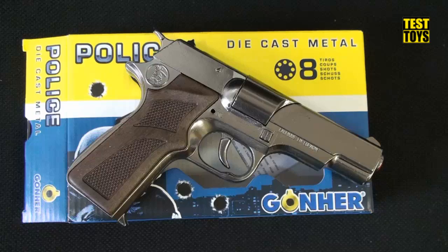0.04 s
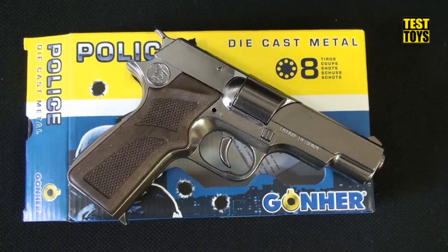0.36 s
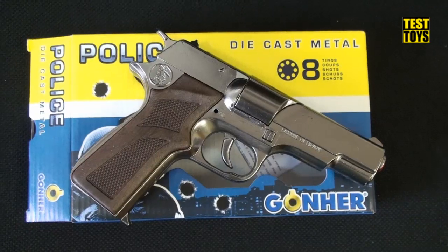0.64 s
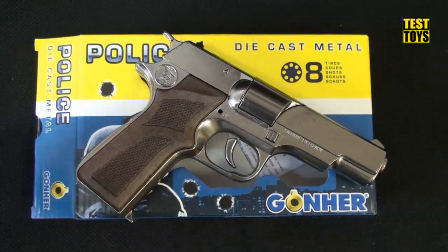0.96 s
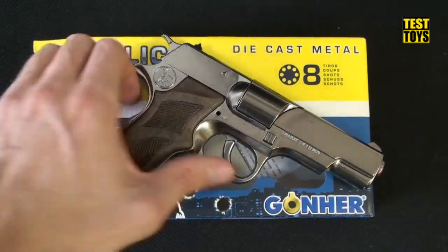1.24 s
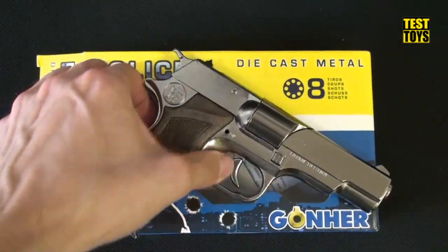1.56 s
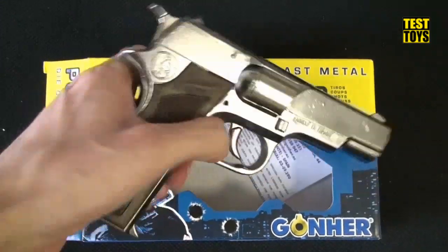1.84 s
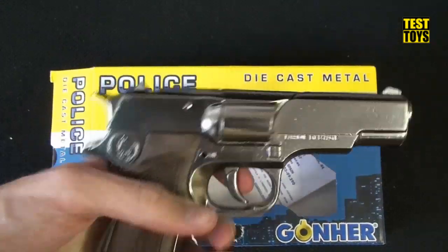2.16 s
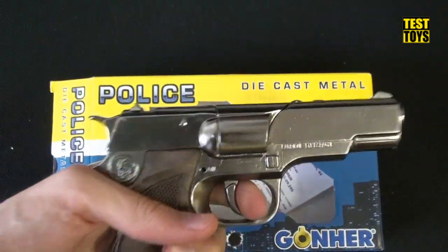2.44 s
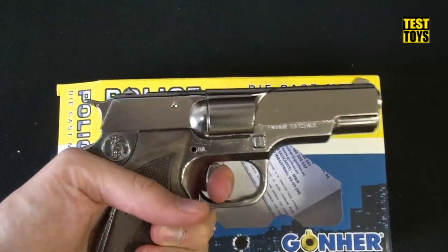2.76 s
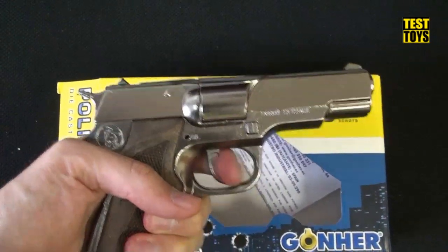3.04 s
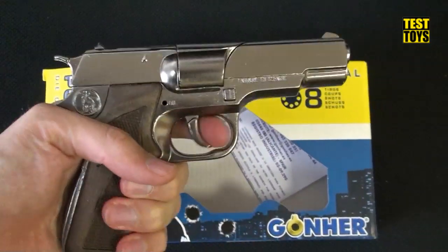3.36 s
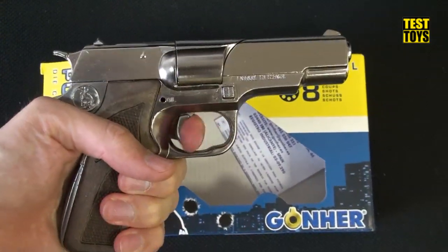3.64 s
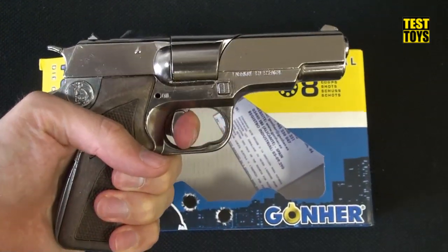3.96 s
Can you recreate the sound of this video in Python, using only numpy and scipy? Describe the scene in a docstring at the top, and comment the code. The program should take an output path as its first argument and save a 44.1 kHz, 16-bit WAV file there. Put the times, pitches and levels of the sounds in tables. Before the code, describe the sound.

Three sharp trigger snaps from a metal toy pistol, after it is lifted off cardboard.

```python
"""A die-cast toy pistol, close to a stereo microphone in a small, quiet room.
It is lifted off its cardboard box, knocking, sliding and rattling, then dry-fired three times.
Each pull scrapes, ticks the cylinder round and drops the hammer; then the trigger snaps back.
The camera's limiter flattens the snaps, so the room's tail swells up behind them."""
import sys
import numpy as np
from scipy import signal
from scipy.fft import rfft, irfft
from scipy.io import wavfile
from scipy.ndimage import uniform_filter1d, minimum_filter1d

SR = 44100
rng = np.random.default_rng(int(sys.argv[2]) if len(sys.argv) > 2 else 0)


def store_pcm(level_fs):
    """Save levels as 16-bit WAV."""
    pcm = np.round(np.clip(level_fs, -1, 1) * 32767).astype(np.int16)
    wavfile.write(sys.argv[1], SR, np.atleast_2d(pcm).T)


N = 176400

# colour of rubbed cardboard: pitch_hz, level_db
CARDBOARD_COLOUR = [(59, -45), (100, 0.5), (330, -23), (605, -3), (845, -5), (1230, -3), (1400, -4),
                    (3360, -15.5), (6570, -18.5), (14800, -39.5)]
# resonances of the loose metal parts: pitch_hz, level_db, t60_s
LOOSE_MODES = [(1890, -11.5, 0.037), (2628, -4, 0.027), (3070, -4.5, 0.021), (3850, -16, 0.067),
               (5920, -10, 0.015)]
# their dense overtones: pitch_hz, level_db
LOOSE_OVERTONES = [(300, -40), (900, -10), (1800, -4.5), (2900, 1.5), (4400, 1), (6500, -2.5), (10300, -17),
                   (13000, -37)]


def amp(db):
    """Decibels to gain."""
    return 10 ** (np.asarray(db) / 20)


def unit_rms(x):
    """Scales to rms 1."""
    return x / np.sqrt(np.mean(x ** 2) + 1e-20)


def curve_at(points, hz):
    """Reads a table on a log-frequency axis."""
    point_hz, value = np.transpose(points)
    return np.interp(np.log(hz + 1), np.log(point_hz + 1), value)


def add(mix, start_s, sound):
    """Mixes a stereo sound in at start_s."""
    part = mix[:, round(start_s * SR):][:, :sound.shape[1]]
    part += sound[:, :part.shape[1]]


def mid_side(unrelated, width_db):
    """Takes two unrelated signals as mid and side; the bass is narrowest."""
    side_colour = [(180, -3), (450, 6), (2200, 5.5), (4800, 3.5), (9000, 5)]  # gain of the side signal: pitch_hz, relative_db
    mid, side = unrelated
    hz = np.fft.rfftfreq(len(mid), 1 / SR)
    side = irfft(rfft(side) * amp(width_db + curve_at(side_colour, hz)), len(mid))
    return np.array([mid + side, mid - side]) / np.sqrt(1 + amp(2 * width_db))


def noise(spectrum, size, width_db, tilt=0):
    """Stereo noise of a given colour, tilted in dB per octave."""
    hz = np.fft.rfftfreq(size, 1 / SR)
    colour = amp(curve_at(spectrum, hz) + tilt * np.log2(np.maximum(hz, 300) / 3000))
    coloured = irfft(rfft(rng.standard_normal((2, size))) * colour, size)
    return unit_rms(mid_side(coloured, width_db))


def stick_slip(size, rough_db):
    """The fluttering gain of a rubbing contact."""
    flutter = unit_rms(uniform_filter1d(rng.standard_normal(size), size=90))
    return unit_rms(amp(rough_db * flutter))


def ring(modes, size, hold_s=0):
    """Dying modes, a little different at each strike and slightly out of step left and right."""
    t = np.arange(size) / SR
    out = np.zeros((2, size))
    for hz, db, t60 in modes:
        phase = 2 * np.pi * rng.random() + .2 * rng.standard_normal((2, 1))
        scatter_db = 2 * rng.uniform(-0.85, 1)
        envelope = amp(db + scatter_db - 60 * np.maximum(t - hold_s, 0) / t60)
        detuned_hz = hz * (1 + 0.01 * rng.standard_normal())
        out += envelope * np.sin(2 * np.pi * detuned_hz * t + phase)
    return out


def strikes(rows, modes, overtones, ring_db, t60_s, width_db, rise_s, hold_s=0):
    """Each contact is a crack of dense overtones plus the part's modes, weighted by where it lands."""
    favour_db, favour_octaves = 10, 0.27  # lift of the modes near struck_hz
    out, t = np.zeros((2, N)), np.arange(4096) / SR
    attack = np.minimum(t / rise_s, 1)
    decay = amp(-60 * np.maximum(t - hold_s, 0) / t60_s)
    for start_s, db, tilt, struck_hz in rows:
        crack = noise(overtones, len(t), width_db, tilt) * decay
        weighted = []
        for hz, mode_db, mode_t60 in modes:
            nearness = np.exp(-(np.log2(hz / struck_hz) / favour_octaves) ** 2)
            weighted.append((hz, mode_db + tilt * np.log2(hz / 3000) + favour_db * nearness, mode_t60))
        ringing = amp(ring_db) * ring(weighted, len(t), hold_s)
        add(out, start_s, amp(db) * attack * (crack + ringing))
    return out


def room_tone():
    """Quiet room air with a wavering low hum."""
    hum_tones = [(90, -77.5), (169, -78), (200, -77.5)]  # partials of the hum: pitch_hz, level_db
    air_colour = [(15, -32), (25, -0.5), (90, -4), (124, -7.5), (167, -7), (224, -7), (292, -9), (334, -10),
                  (999, -10.5), (1240, -8.5), (1800, -16), (2230, -17), (4460, -23.5), (13000, -30.5),
                  (14800, -39)]  # spectrum of the air: pitch_hz, relative_db
    t = np.arange(N) / SR
    hum = np.zeros(N)
    for hz, db in hum_tones:
        drift = np.cumsum(rng.standard_normal(N)) * 0.02536
        hum += amp(db) * np.sqrt(2) * np.sin(2 * np.pi * hz * t + drift)
    return amp(-65.5) * noise(air_colour, N, width_db=-6) + hum


def arm_rustle():
    """Faint rustles of the arm moving before it reaches in."""
    rustles = [(0.407, 0.034, -68.5), (0.475, 0.027, -65), (0.605, .04, -66), (1.053, 0.039, -68)]  # arm movements: start_s, length_s, level_db
    out = np.zeros((2, N))
    for start_s, length_s, db in rustles:
        size = int(length_s * SR)
        rub = noise(CARDBOARD_COLOUR, size, width_db=-18) * stick_slip(size, rough_db=2)
        add(out, start_s, amp(db) * rub * np.sqrt(np.hanning(size)))
    return out


def box_knocks():
    """Finger and gun knock on the cardboard box and set it ringing."""
    knocks = [(.735, -61.5, 4, 1100), (1.2112, -35.5, -1, 505), (1.2185, -48, -3.5, 1010),
              (1.2938, -42.5, -0.5, 630), (1.3828, -45.5, -2, 1370), (1.5642, -39, 4.5, 1600),
              (1.6655, -50.5, -1, 1500), (1.676, -55, -2, 1210), (1.721, -56, -3, 1100),
              (1.784, -32.5, 2.5, 1120)]  # contacts: start_s, level_db, tilt_db_per_octave, struck_hz
    modes = [(94.6, -31, 1), (256, -23.5, 0.07), (402, -13, 0.074), (522, -7, 0.047), (650, -7, 0.052),
             (912, -20, 0.091), (1126, 0, 0.031), (1310, -23, 0.017), (2260, 0, 0.017)]  # box resonances: pitch_hz, level_db, t60_s
    overtones = [(88, -49), (150, -33), (468, -6), (860, -8), (1140, 4.5), (1490, -3), (9050, -26),
                 (11600, -31), (14000, -38)]  # colour of a knock: pitch_hz, level_db
    return strikes(knocks, modes, overtones, ring_db=-1.5, t60_s=0.032, width_db=-16, rise_s=0.00088)


def box_slide():
    """The gun and the hand drag over the cardboard: a soft rub with many tiny slips."""
    drag = [(1.21, -66), (1.24, -60.5), (1.31, -64.5), (1.35, -54.5), (1.43, -62.5), (1.481, -55),
            (1.53, -65), (1.62, -63.5), (1.71, -57.5), (1.754, -53), (1.78, -45.5), (1.81, -52.5),
            (1.9, -64.5), (2.05, -68), (2.252, -74)]  # loudness of the drag: time_s, level_db
    slips_per_s, slip_spread_db, slip_t60_s = 350, 4.5, 0.021
    level_db = np.interp(np.arange(N) / SR, *np.transpose(drag), left=-120, right=-120)
    slipping = rng.random(N) < slips_per_s / SR
    slips = slipping * amp(slip_spread_db * np.minimum(rng.exponential(1, N), np.pi))
    grain = signal.lfilter([1], [1, -amp(-60 / (slip_t60_s * SR))], slips)
    friction = unit_rms(unit_rms(grain) + 1)  # slips and steady rub in equal parts
    return amp(level_db) * noise(CARDBOARD_COLOUR, N, width_db=-18) * friction


def grip_clinks():
    """Tiny random clinks while the grip shifts."""
    count, first_s, last_s = 22, 1.6, 2.7
    when, softness, octaves = rng.random((count, 3)).T
    start_s = first_s + when * (last_s - first_s)
    level_db = -64.5 - 3.5 * np.log(softness + 0.069)
    struck_hz = 1900 * 2 ** octaves
    clinks = zip(start_s, level_db, np.zeros(count), struck_hz)
    return strikes(clinks, LOOSE_MODES, LOOSE_OVERTONES,
                   ring_db=-8, t60_s=0.036, width_db=-6, rise_s=0.0029)


def loose_rattle():
    """Loose metal parts clink together as the gun is lifted."""
    clinks = [(1.7685, -38.5, 3.5, 6000), (1.7762, -39, 6, 3020), (1.8295, -37, 2, 3030),
              (1.836, -33.5, -7.5, 2700), (1.850, -40.5, 6, 2650), (1.873, -36, -3, 3880),
              (1.9042, -32.5, 2, 3100), (1.911, -35, 7, 3160), (1.9248, -32, -1, 3070),
              (2.1053, -33, 1, 5900), (2.4, -42, -6.5, 2530), (2.4165, -43.5, -6, 1960),
              (2.427, -42.5, -5.5, 2540), (2.5155, -46.5, -4.5, 1990)]  # contacts: start_s, level_db, tilt_db_per_octave, struck_hz
    return strikes(clinks, LOOSE_MODES, LOOSE_OVERTONES,
                   ring_db=1.5, t60_s=0.033, width_db=-17.5, rise_s=0.0013)


def pawl_ticks():
    """The pawl ticks against the cylinder, pushing it round."""
    ticks = [(2.186, -53.5, -6.5, 1850), (2.7485, -33, -1.5, 1850), (2.7612, -19.5, -4, 2680),
             (3.039, -47.5, -0.5, 1970), (3.079, -50.5, -3.5, 1930), (3.119, -47.5, -2, 2100),
             (3.143, -38.5, -2.5, 2020), (3.1515, -41, 3.5, 5610), (3.168, -42, -2, 2660),
             (3.290, -37.5, -0.5, 2640), (3.483, -48.5, -2, 1980), (3.525, -55, -5, 2040),
             (3.5595, -51, -4, 2000), (3.571, -43, -1, 2620), (3.578, -49, 0, 2660),
             (3.5868, -24, -2.5, 2760), (3.754, -39.5, 5, 1900), (3.895, -46.5, 1, 2210),
             (3.983, -47.5, -4, 2680)]  # contacts: start_s, level_db, tilt_db_per_octave, struck_hz
    modes = [(820, -22, 0.026), (1163, -15, 0.024), (1857, -6, 0.025), (2030, -8.5, 0.029),
             (2650, -1, 0.02), (5480, -7, 0.014)]  # pawl and cylinder resonances: pitch_hz, level_db, t60_s
    overtones = [(300, -69), (620, -23), (900, -10), (1900, -13), (2650, 1.5), (3400, -10), (6500, -3),
                 (10000, -14.5), (14800, -24)]  # colour of a tick: pitch_hz, level_db
    return strikes(ticks, modes, overtones,
                   ring_db=-1.5, t60_s=0.031, width_db=-15.5, rise_s=0.002, hold_s=0.0005)


def linkage_scrape():
    """The trigger linkage rubs harder and harder until it lets go."""
    scrapes = [(2.321, 0.026, -58.5), (2.359, 0.061, -59.5), (2.724, 0.054, -39), (2.911, 0.022, -39),
               (3.126, 0.07, -39), (3.31, 0.03, -40.5), (3.531, 0.085, -44.5), (3.758, 0.022, -41),
               (3.957, 0.04, -49)]  # strokes of the linkage: start_s, length_s, level_db
    colour = [(300, -56), (900, 3), (2300, 5), (5500, 2), (9000, -1.5), (15000, -12)]  # spectrum of the rub: pitch_hz, level_db
    rise_db = 22.5
    out = np.zeros((2, N))
    for start_s, length_s, db in scrapes:
        progress = np.linspace(0, 1, int(length_s * SR))
        rub = noise(colour, 4096, width_db=-12) * stick_slip(4096, rough_db=-0.5)
        add(out, start_s, rub[:, :len(progress)] * amp(db - rise_db * (1 - progress) ** 2))
    return out


def hammer_fall():
    """The hammer slams home, bounces once and leaves its spring singing faintly."""
    falls = [(2.7736, -6, 2.5, 2440), (3.177, -6, 3.5, 2650), (3.604, -5.5, 3.5, 1150)]  # blows: start_s, level_db, tilt_db_per_octave, struck_hz
    modes = [(1122, -15, 0.044), (1886, -22, 0.044), (2667, -13.5, 0.037), (4005, -2, 0.015),
             (6280, -8.5, 0.017), (7670, -12, 0.014)]  # hammer resonances: pitch_hz, level_db, t60_s
    overtones = [(300, -53), (600, -15), (1000, -4), (2600, -3.5), (4000, -3), (6800, -3.5), (8600, -13),
                 (11500, -9.5), (15000, -28.5)]  # colour of the snap: pitch_hz, level_db
    spring_modes = [(2540, -34.5, 0.45)]  # the spring's note: pitch_hz, level_db, t60_s
    bounce_s, bounce_db = 0.0042, -8
    bounces = [(start_s + bounce_s, db + bounce_db, tilt, hz) for start_s, db, tilt, hz in falls]
    out = strikes(falls + bounces, modes, overtones,
                  ring_db=-7.5, t60_s=0.017, width_db=-15, rise_s=0.0002, hold_s=0.00096)
    for start_s, db, _, _ in falls:
        add(out, start_s, amp(db) * ring(spring_modes, SR))
    return out


def trigger_return():
    """The trigger springs back, chatters against its stop for a moment and is still."""
    returns = [(2.9353, -18.5, 1, 5370, 0.0037), (3.3394, -18, 1, 4860, 0.0034),
               (3.7028, -19.5, 2.5, 3970, 0.00073), (3.7769, -20, 1.5, 5030, 0.004)]  # releases: start_s, level_db, tilt_db_per_octave, struck_hz, chatter_s
    modes = [(919, -16.5, 0.054), (1850, -7, 0.013), (2893, -8.5, 0.018), (4070, -8.5, 0.014),
             (4750, -11, 0.0081), (5490, -12.5, 0.016)]  # trigger resonances: pitch_hz, level_db, t60_s
    overtones = [(300, -54), (700, -19), (1400, -11), (1900, -0.5), (3400, -2), (4600, 4.5), (6500, 5),
                 (8800, -4), (12000, -7), (15000, -16.5)]  # colour of the click: pitch_hz, level_db
    return sum(strikes([contact], modes, overtones,
                       ring_db=-6, t60_s=0.02, width_db=-14.5, rise_s=0.0014, hold_s=chatter_s)
               for *contact, chatter_s in returns)


def room_tail(send, width_db):
    """The small room's diffuse tail: each band builds with the energy fed in and dies at its own rate."""
    decay_times = [(200, 0.12), (1000, 0.38), (3000, 0.36), (6000, 0.27), (10000, 0.23), (15000, 0.13)]  # reverberation time: pitch_hz, t60_s
    colour = [(200, -1), (1000, -2.5), (2600, 0), (5000, -0.5), (8000, 3), (15000, -1)]  # tone of the tail: pitch_hz, level_db
    build_s, frames = .009, dict(nperseg=256, noverlap=192)
    hz, t, spectrum = signal.stft(send.mean(0), SR, **frames)
    hop_s, power = t[1], abs(spectrum) ** 2
    # energy spreads into neighbouring bands, furthest in the treble
    narrow, broad = uniform_filter1d(power, size=5, axis=0), uniform_filter1d(power, size=7, axis=0)
    fed = np.where(hz[:, None] < 3400, narrow, broad)
    fed = np.pad(fed, ((0, 0), (4, 0)))[:, :len(t)]  # the tail arrives about 6 ms late
    build = np.exp(-hop_s / build_s)
    fed = signal.lfilter([1 - build], [1, -build], fed)
    retained = amp(-60 * hop_s / curve_at(decay_times, hz)) ** 2
    stored = np.array([signal.lfilter([1 - k], [1, -k], band) for k, band in zip(retained, fed)])
    wash = signal.stft(rng.standard_normal((2, N)), SR, **frames)[2]
    wash /= np.sqrt(np.mean(abs(wash) ** 2))
    tail = wash * np.sqrt(abs(stored)) * amp(curve_at(colour, hz))[:, None]
    return mid_side(signal.istft(tail, SR, **frames)[1][:, :N], width_db)


def scene():
    """Handling and mechanism close to the microphone, just right of centre, with the room behind."""
    handling = box_knocks() + box_slide() + arm_rustle() + loose_rattle() + grip_clinks()
    pulls = pawl_ticks() + linkage_scrape()
    snaps = hammer_fall() + trigger_return()
    direct = handling * amp([[-.9], [.9]]) + (pulls + snaps) * amp([[-.5], [.5]])
    send = amp(-13) * handling + amp(-12.5) * pulls + amp(-12) * snaps
    return direct + room_tail(send, width_db=-11.5) + room_tone()


def record(dry):
    """The camera fades in, its limiter ducks on each snap, the bass most, and the top treble is cut."""
    limit_db, recover_db_per_s = -14, 196
    bass_hz, bass_extra_ratio, cutoff_hz = 660, 13, 15100
    t = np.arange(N) / SR
    peak_db = 20 * np.log10(-minimum_filter1d(-abs(dry).max(0), size=60) + 1e-9)
    over_db = np.maximum(peak_db - limit_db, 0)
    recovery_db = t * recover_db_per_s
    duck_db = uniform_filter1d(np.maximum.accumulate(over_db + recovery_db) - recovery_db, size=40)
    hz = np.fft.rfftfreq(N, 1 / SR)
    bass = irfft(rfft(dry) / (1 + (hz / bass_hz) ** 8), N)
    limited = (dry - bass + bass * amp(-bass_extra_ratio * duck_db)) * amp(-duck_db)
    fade_in = np.clip((t - .07) / 0.023, 0, 1)
    lowpass = signal.firwin(255, cutoff_hz, window=("kaiser", 8), fs=SR)
    return signal.oaconvolve(limited * fade_in, lowpass[None], "same")


dry = scene()
out = record(dry)
store_pcm(out)
```